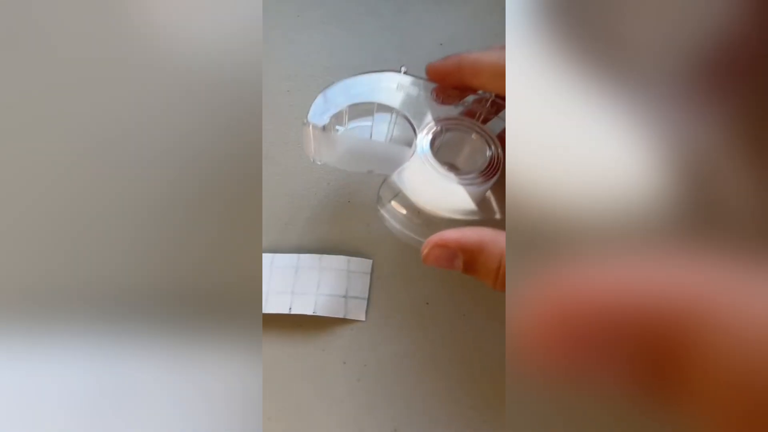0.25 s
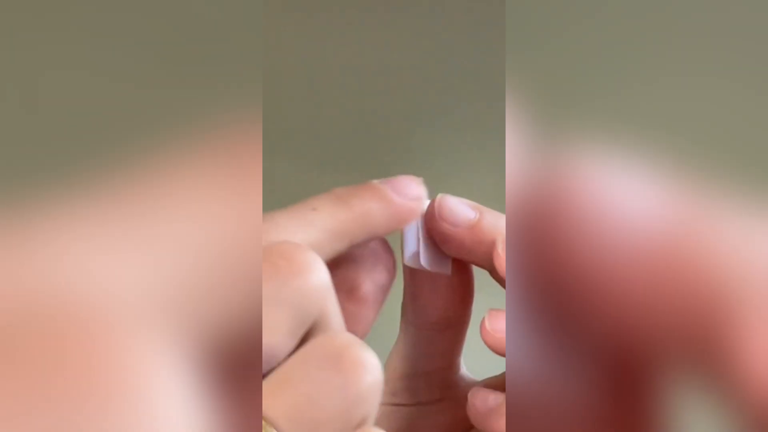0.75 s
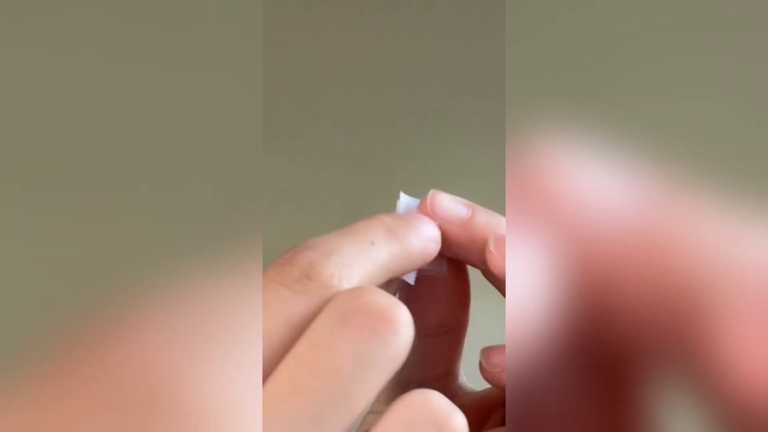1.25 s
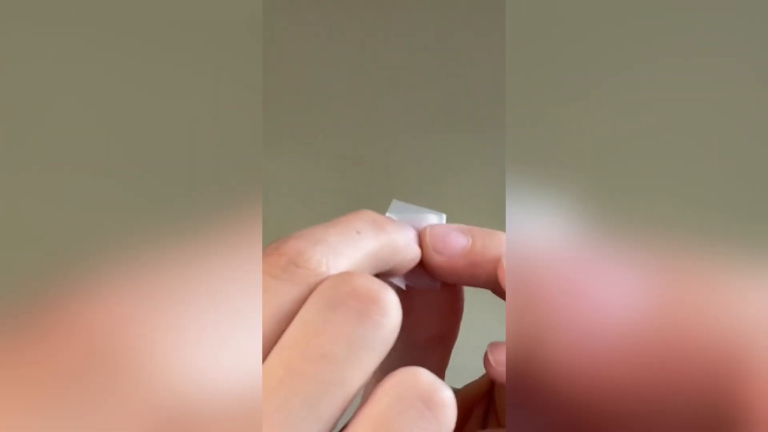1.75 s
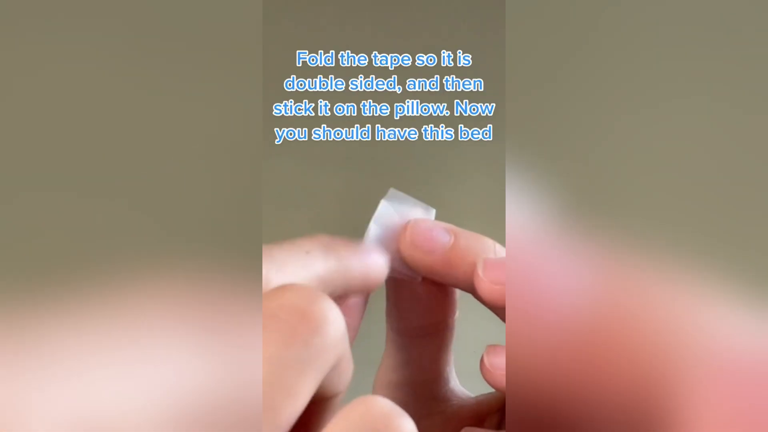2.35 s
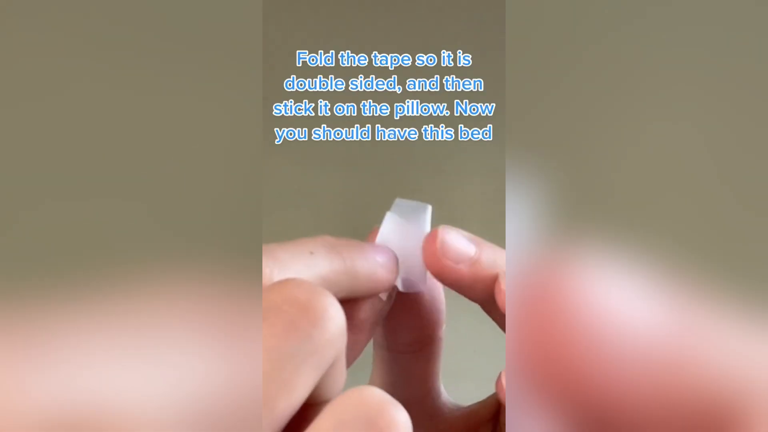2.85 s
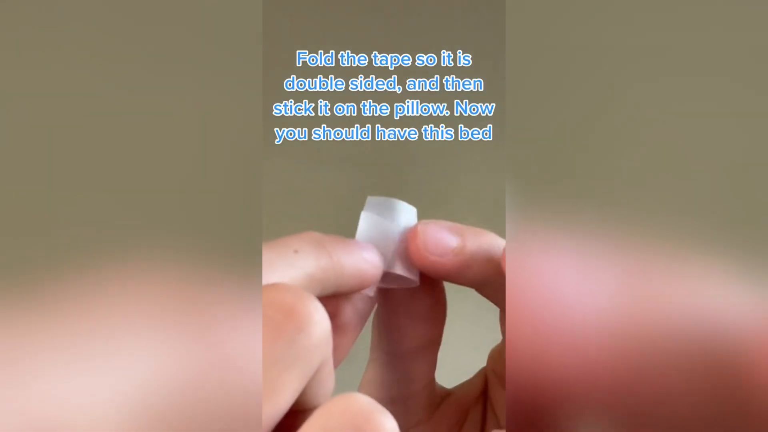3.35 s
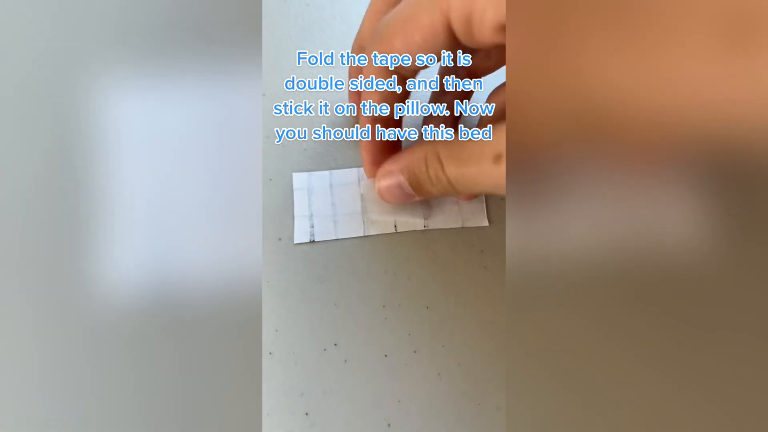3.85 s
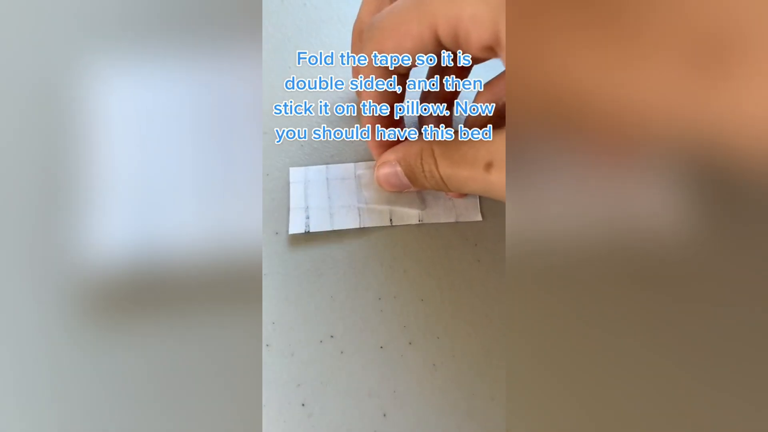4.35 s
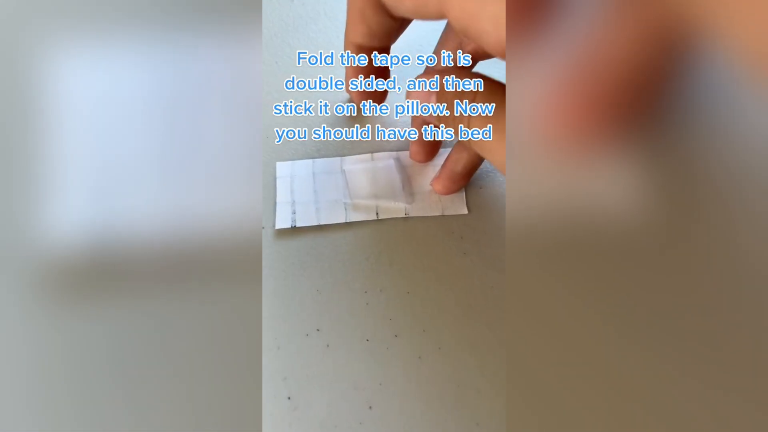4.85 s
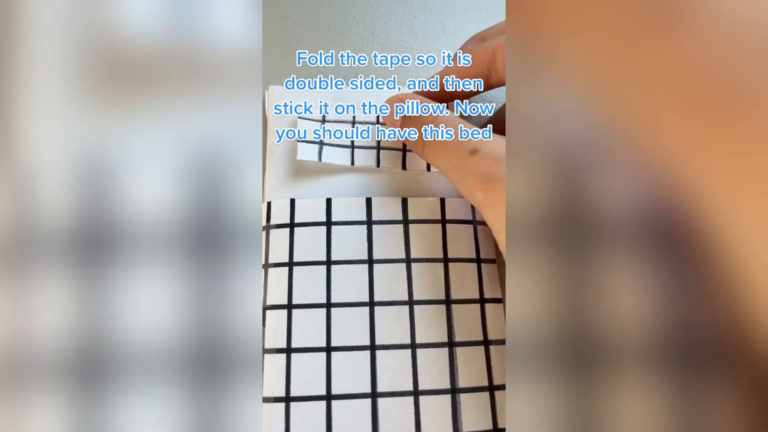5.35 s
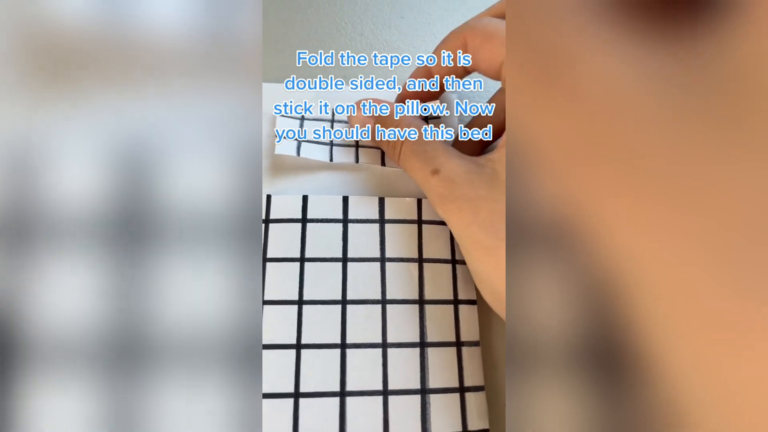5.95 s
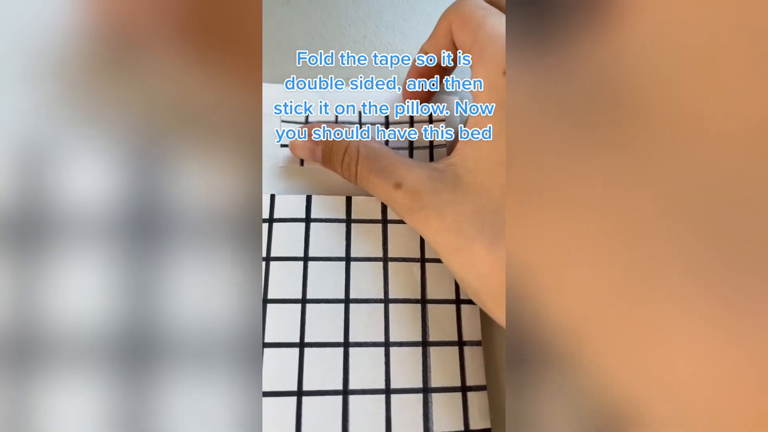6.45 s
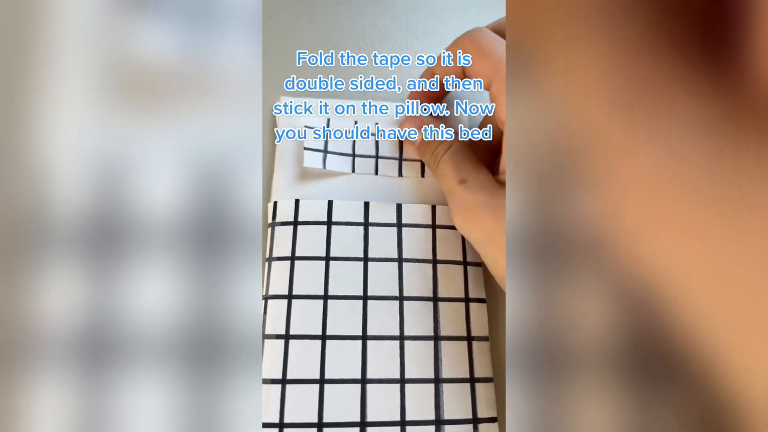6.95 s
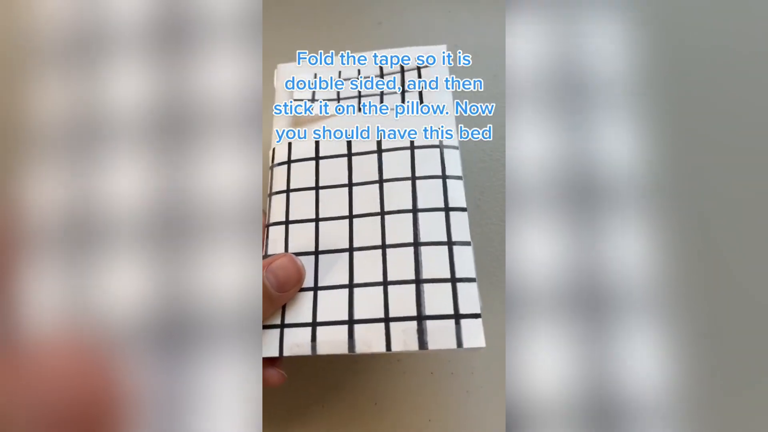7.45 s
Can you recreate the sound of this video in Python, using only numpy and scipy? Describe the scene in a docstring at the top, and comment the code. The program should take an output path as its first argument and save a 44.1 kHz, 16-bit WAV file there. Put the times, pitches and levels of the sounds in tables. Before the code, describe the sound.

Sticky tape crackles and snaps between fingers, then is pressed and rubbed onto paper on a desk, over a low ventilation rumble with brief near-silent gaps.

```python
"""Sticky tape on a small desk

Fingers fold a strip of tape, press it onto paper and smooth it down on a desk, close to a microphone.
Glue snaps are a pop plus tearing noise through resonances; film and paper are shaped, grainy noise.
A thumb judders over the sheet in short scuffs; ventilation is rumble, duct tone, room air and treble hiss.
A room tail answers the hands, and the sound drops almost to silence four times."""
import sys
import numpy as np
from scipy import signal
from scipy.fft import rfft, irfft, next_fast_len
from scipy.io import wavfile
from scipy.ndimage import uniform_filter1d

SR = 44100
rng = np.random.default_rng(int(sys.argv[2]) if len(sys.argv) > 2 else 0)


def dump(signal):
    """Clip the signal to [-1, 1] and save it as 16-bit WAV at the path in sys.argv[1]."""
    limited = np.clip(np.atleast_2d(signal).T, -1, 1)
    pcm = np.round(limited * 32767).astype(np.int16)
    wavfile.write(sys.argv[1], SR, pcm)


N = 339950

# near-silent gaps between the passages: start t/s, end t/s
GAPS = [(.292, .330), (3.360, 3.543), (4.893, 5.061), (6.995, 7.160)]
# ventilation rumble resonances: f/Hz, width/Hz, relative level/dB
RUMBLE_MODES = [(53.63, 10.6, 1.5), (61.85, 26.12, -6), (115.7, 16.35, -14.5)]
# room air noise before the work moves to the desk: f/Hz, relative density level/dB per Hz
ROOM_AIR = [(88, -37.5), (150, -9.5), (197, -21.5), (297, -4), (328, -27), (391, 1.5), (448, -12.5),
            (612, -23.5), (702, -30), (774, -23.5), (923, -55.5), (1040, -47.5), (2600, -37),
            (13200, -61.5), (16000, -66)]
# room air noise heard low over the desk: f/Hz, relative density level/dB per Hz
DESK_AIR_COLOUR = [(88, -34.5), (150, -21.5), (286, 1), (354, -14.5), (431, 5), (534, -13), (790, -13),
                   (941, -53), (1020, -18), (1390, -29), (5910, -39.5), (16000, -57.5)]
# duct resonances, before the response is squared: f/Hz, width/Hz, relative level/dB
DUCT_MODES = [(392.2, 17, -2), (766, 12, -10.5)]
# faint steady treble hiss: f/Hz, relative density level/dB per Hz
TREBLE_HISS = [(800, -21), (2200, -4), (7000, -3), (16000, -14)]
# ventilation per passage: rumble start level/dB, rumble end level/dB, air level/dB,
# duct tone level/dB, treble hiss level/dB
VENTILATION_LEVELS = [(-50.5, -49.5, -62.5, -75.5, -92), (-47.5, -45, -64.5, -62.5, -86.5),
                      (-52, -44.5, -64.5, -73.5, -96), (-51.5, -41, -67.5, -73, -83),
                      (-56.5, -49.5, -68.5, -76, -95)]
# rustling film noise: f/Hz, relative density level/dB per Hz
FILM_COLOUR = [(2500, -41), (3800, -2), (6000, -2), (10500, 2.5), (12500, -7.5), (15000, 1), (16500, -13.5)]
# resonances of the scraped sheet: f/Hz, width/Hz, relative level/dB
PAPER_MODES = [(1919, 330, 1.5), (2275, 220, 3.5), (3180, 1600, -4.5), (4050, 240, -12.5)]
# dull noise from the desk: f/Hz, relative density level/dB per Hz
DESK_COLOUR = [(88, -39.5), (150, -11), (216, -7.5), (274, -3.5), (483, -3.5), (544, -10), (1210, -20),
               (1600, -20), (2080, -42.5), (3520, -120)]
# thumb bearing down on the desk: middle t/s, level/dB
PRESSES = [(4.131, -54), (4.387, -57.5), (4.547, -52.5), (5.66, -54), (5.84, -59), (6.485, -50.5),
           (6.82, -50)]
# skin over film and paper: start t/s, length/s, rustle level/dB, paper pressure level/dB, film f/Hz
RUBS = [(0.451, 0.04, -79, -87, 4730), (0.555, 0.13, -75.5, -82, 8900), (0.704, 0.67, -83, -88.5, 9500),
        (0.78, 0.068, -75, -86.5, 6460), (0.86, 0.033, -67.5, -84, 9700), (0.933, 0.048, -62, -78, 9500),
        (1.002, 0.024, -57.5, -85, 9300), (1.05, 0.056, -77, -88, 6890), (1.116, 0.022, -65.5, -84, 9600),
        (1.159, 0.022, -74, -93, 9646), (1.246, 0.04, -66.5, -84, 7560), (1.441, 0.027, -72, -94, 9646),
        (1.526, 0.075, -75, -90, 9800), (1.645, 0.17, -79, -81.5, 5660), (2.018, 0.06, -69, -88, 10700),
        (2.106, 0.064, -73.5, -84, 6460), (2.184, 0.079, -70.5, -76, 6700), (2.512, 0.35, -73, -91.5, 7000),
        (3.108, 0.11, -84.5, -80, 5130), (3.224, 0.073, -78, -80, 6000), (3.295, 0.054, -70.5, -83, 8450),
        (3.703, 0.15, -80, -80, 10900), (3.859, 0.018, -92, -67, 5857), (3.938, 0.029, -81, -70, 10335),
        (4.111, 0.033, -71.5, -63.5, 10680), (4.229, 0.056, -78.5, -85, 7579),
        (4.334, 0.029, -64, -76, 7500), (4.515, 0.05, -80, -70, 7579), (4.844, 0.11, -79.5, -72.5, 5960),
        (5.213, 0.11, -80, -76.5, 4900), (5.411, 1.6, -85.5, -81.5, 6950), (5.43, 0.11, -79.5, -81.5, 6900),
        (5.563, 0.17, -70, -68.5, 6760), (5.815, 0.044, -69.5, -63, 5660), (5.912, 0.062, -74, -72, 5050),
        (6.019, 0.086, -71, -73, 6960), (6.141, 0.12, -68, -66, 5270), (6.257, 0.15, -86, -74, 5400),
        (6.442, 0.098, -90, -68, 5512), (6.486, 0.091, -67, -80, 6040), (6.576, 0.14, -64, -70.5, 6100),
        (6.716, 0.068, -73.5, -63.5, 5800), (6.785, 0.067, -81, -57, 5857),
        (6.833, 0.071, -65, -68.5, 5870), (6.944, 0.16, -70.5, -70.5, 5180),
        (7.173, 0.15, -85.5, -88, 4840)]
# paper lying on the desk, rung by the slips: f/Hz, width/Hz, relative level/dB
SHEET_MODES = [(584, 230, 15), (2270, 610, 4.5), (3140, 230, 3), (5800, 1700, -7)]
# glue letting go: t/s, peak reference level/dB, tearing noise over the pop level/dB (halved later),
# body level/dB, torn edge level/dB, film f/Hz; body and edge levels are relative to the reference
GLUE_SNAPS = [(0.464, -49, -2, -4.5, -31, 4230), (0.6062, -30.5, 19, -6, -9, 7640),
              (0.765, -54, -9, -18, -4, 4400), (0.798, -53.5, -5, -7, 1, 6860),
              (0.8623, -54, 7, -8, -11, 9800), (0.95, -51, 3, -15, 3, 10600),
              (0.987, -41, 4, -26, -3, 9000), (1.011, -37.5, -7, -40, -10.5, 10200),
              (1.113, -49, -10, -10, -22, 9700), (1.1975, -32, -7.5, -13, -25, 8500),
              (1.2254, -36.5, -10, -15, -18, 10500), (1.226, -31, 0, -10.5, -24, 9200),
              (1.288, -34.5, -4, -18, -30, 10100), (1.568, -39.5, 24, -27, -28, 9600),
              (1.6765, -47.5, 1, -0.5, -33, 5760), (1.7786, -48.5, -6, 0, -17, 5370),
              (2.036, -30, -5.5, -17.5, -3, 10000), (2.122, -44.5, 1.5, -0.5, -4, 6060),
              (2.246, -38.5, -4, -4, -1, 6230), (2.5289, -33.5, -9.5, -15, -2.5, 7600),
              (2.56, -45.5, -0.5, -27.5, -22, 7360), (2.7358, -21.5, -12, -5.5, -0.5, 7200),
              (2.7389, -18.5, 1, -28.5, -7, 6100), (2.745, -42, 8.5, -22, -10, 7600),
              (2.7483, -20, -7, -18, -9.5, 7300), (3.093, -54, 7, 0, -27.5, 4680),
              (3.109, -55, -8, -9, -30, 5300), (3.137, -52, -12.5, 2, -17, 4000),
              (3.1458, -46.5, -10, -7, -27, 5500), (3.181, -53, -10, -10, -16, 5200),
              (3.2268, -44, -12, -4, -31, 4770), (3.2564, -51, -19.5, 3, -30, 5360),
              (3.6091, -25.5, -12, -23, -31, 9800), (3.717, -48, -16, -4, -33, 5300),
              (3.7236, -33.5, -4, -3.5, -11, 9800), (3.751, -26, -10.5, -4.5, -12, 9700),
              (4.264, -40.5, -2.5, -4.5, -25.5, 5770), (4.2848, -55.5, -9, 2, -10, 7360),
              (4.311, -28, -9, -7, -21, 5800), (4.3784, -24.5, -5, -5, -10.5, 7800),
              (4.3806, -36.5, 4, -5, -2, 8200), (4.3842, -43, 2.5, -12, 7, 8400),
              (4.3884, -45.5, 7.5, -6, 3, 10200), (4.391, -30.5, 0, -1.5, -5, 8440),
              (4.3918, -42.5, -2, 1, -9, 10500), (4.5426, -28.5, 4.5, -8, -13, 5900),
              (4.5456, -26, 2, -11.5, -11, 7800), (4.548, -63.5, -18.5, -7, -13, 7900),
              (4.8684, -51, -4, -10, -28.5, 4980), (5.45, -51, 1, -9.5, -23, 5800),
              (5.567, -56, -8, 1, -20, 5040), (5.578, -42.5, -3, 0.5, -18, 8800),
              (5.6092, -45.5, -2, 4.5, -30, 7470), (5.6295, -43, 6, -3.5, -30, 8000),
              (5.645, -47, -3, -7, -11, 7290), (5.6692, -42, -5, 2, -18, 7900),
              (5.778, -59, 5, 0, -10, 5600)]
# decay of the room: f/Hz, t60/s
ROOM_DECAY = [(500, 0.69), (2500, 0.32), (8000, 0.21), (16000, 0.1)]

ON_DESK_S = 3.45  # from here on the work lies on the desk
THUMP_S = 0.056  # width of a press between its 1/e points
DRONE_DB = 6  # desk drone over the paper scrape at any pressure
# one catch, then a run of slips: middle, spacing, top level, loss at its ends
CATCH_S, CATCH_DB = 6.7615, -34.5
JUDDER_S, SLIP_GAP_S, JUDDER_DB, SWELL_DB = 6.8198, .0108, -28.5, 6.5
SNAP_T60_S, T60_SCATTER = 0.019, 0.15  # tear decay time and its log-normal scatter
# pop delay; level of the hiss around the pop before halving, its e-fold time
LEAD_S, LEAD_DB, LEAD_RISE_S = 0.001, -16, 0.0022
# faint snaps: level over the rustle, its spread, body, torn edge, tear before halving
TICK_DB, TICK_SCATTER_DB, TICK_BODY_DB, TICK_EDGE_DB = 15, 1, -15, -13.5
TICK_TEAR_DB = -4
TOP_HZ, SLOPE_HZ = 16900, 1200  # band limit and the width of its slope


def amp(db):
    """Gain of a level in dB."""
    return 10 ** (np.asarray(db) / 20)


def unit(x):
    """x at rms 1."""
    return x / np.sqrt(np.mean(x ** 2) + 1e-20)


def peak(x):
    """x at peak 1."""
    return x / np.abs(x).max()


def along(points, hz):
    """Read a (f/Hz, value) curve on a log frequency axis."""
    f, v = np.transpose(points)
    return np.interp(np.log(hz + 1), np.log(f + 1), v)


def colour(spectrum):
    """Frequency gain drawn through (f/Hz, level/dB) points."""
    return lambda hz: amp(along(spectrum, hz))


def filtered(x, response):
    """x shaped by a complex response of frequency."""
    m = next_fast_len(len(x) + 8192)
    return irfft(rfft(x, m) * response(np.fft.rfftfreq(m, 1 / SR)), m)[:len(x)]


def modes(table):
    """Response of (f/Hz, width/Hz, level/dB) resonances side by side, with alternating signs."""
    def response(f):
        total = 0
        for k, (center, width, db) in enumerate(table):
            damping = 1j * f * width
            total = total + (-1) ** k * amp(db) * damping / (center * center - f * f + damping)
        return total
    return response


def hiss(response, grain_db=0, grain_s=0.003):
    """Filtered noise of rms 1; grain_db roughens it into many tiny bursts."""
    flutter = unit(uniform_filter1d(rng.standard_normal(N), max(1, int(grain_s * SR))))
    grain = amp(grain_db * flutter)
    return unit(filtered(grain * rng.standard_normal(N), response))


def ventilation():
    """A fan's unsteady rumble, a fuzzy duct tone, the air of the room and a faint treble hiss."""
    rumble = hiss(modes(RUMBLE_MODES))
    # the rumble wavers less than free noise: part of its own swell is evened out
    swell = np.sqrt(np.abs(uniform_filter1d(rumble ** 2, int(.06 * SR)))) + 0.09
    # a steep low cut clears the bottom below 43 Hz
    rumble = unit(filtered(rumble / swell ** 0.49, lambda f: 1 / (1 + (43 / (f + 1)) ** 9)))
    tone = hiss(lambda f: modes(DUCT_MODES)(f) ** 2)
    t = np.arange(N) / SR
    passage = np.searchsorted(np.transpose(GAPS)[1], t)
    air = np.where(t > ON_DESK_S, hiss(colour(DESK_AIR_COLOUR)), hiss(colour(ROOM_AIR)))
    treble = hiss(colour(TREBLE_HISS))
    start_db, end_db, air_db, tone_db, treble_db = np.transpose(VENTILATION_LEVELS)
    # the rumble glides evenly in dB through each passage
    rumble_db = np.interp(t, [0, *np.ravel(GAPS), N / SR], np.ravel([start_db, end_db], "F"))
    low = amp(rumble_db) * rumble + amp(tone_db)[passage] * tone
    return low + amp(air_db)[passage] * air + amp(treble_db)[passage] * treble


def whistle():
    """Noise through two narrow resonances, nearly an octave apart, whistles as the pad is lifted."""
    t = np.arange(N) / SR
    narrow = hiss(lambda f: modes([(2050, 170, 2.5), (3850, 350, -5)])(f) ** 2)
    return amp(-79.5) * narrow * (t > GAPS[-1][1]) * np.clip((7.36 - t) / 0.03, 0, 1)


def room(x):
    """Delayed decaying noise forms the room's answer; each frequency dies at its own speed."""
    hz, t, z = signal.stft(rng.standard_normal(SR // 2), SR, nperseg=256)
    decay = amp(-60 * t / along(ROOM_DECAY, hz)[:, None])
    tail = signal.istft(z * decay, SR, nperseg=256)[1]
    return signal.fftconvolve(np.pad(x, (120, 0)), tail / np.linalg.norm(tail))[:N]


def desk_echo(x):
    """The desk top returns the sound a fraction of a millisecond late: a comb of peaks and notches."""
    late = filtered(x, lambda f: 0.28 * np.exp(-2j * np.pi * f * 0.000369))  # delay in s
    return x + late * (np.arange(N) / SR > ON_DESK_S)


def thumps():
    """Each press swells and fades as a dull burst through the desk."""
    t = np.arange(N) / SR
    swell = sum(amp(db) * np.exp(-((t - s) / (THUMP_S / 2)) ** 2) for s, db in PRESSES)
    return swell * hiss(colour(DESK_COLOUR), grain_db=7.0, grain_s=0.005)


def handling():
    """Each stroke rustles the film at its own pitch, scrapes the paper and presses a dull desk drone."""
    out = np.zeros(N)
    film = hiss(colour(FILM_COLOUR), grain_db=1.0, grain_s=0.0012)
    paper = hiss(modes(PAPER_MODES), grain_db=3.5, grain_s=0.0039)
    desk = hiss(colour(DESK_COLOUR), grain_db=0.5, grain_s=0.0076)
    edge = 0.019  # s; skin takes this long to grip and to let go
    for s, length, film_db, press_db, film_hz in RUBS:
        # a stroke never runs past the end of the next gap
        limits = [end for _, end in GAPS if end > s + edge]
        stop = min(s + length + edge / 2, *limits, N / SR)
        span = slice(max(round((s - edge / 2) * SR), 0), round(stop * SR))

        def film_tone(f):
            low_cut = f ** 4 / (f ** 4 + (0.24 * film_hz) ** 4)
            return low_cut + modes([(film_hz, 1200, 8)])(f)

        rustle = unit(filtered(film[span], film_tone))
        push = signal.windows.tukey(len(rustle), min(2 * edge * SR / len(rustle), 1))
        scrape = paper[span] + amp(DRONE_DB) * desk[span]
        out[span] += push * (amp(film_db) * rustle + amp(press_db) * scrape)
    return out


def slips():
    """The thumb catches once, then judders: each slip is a short scuff ringing the sheet."""
    out, t = np.zeros(N), np.arange(SR // 30) / SR
    place = np.arange(6) - 5 / 2  # six slips about the middle
    run_db = JUDDER_DB - SWELL_DB * (place / place[-1]) ** 2
    run = zip(JUDDER_S + SLIP_GAP_S * place, run_db)
    for s, db in [(CATCH_S, CATCH_DB), *run]:
        envelope = amp(-60 * t / 0.0078) * (1 - np.exp(-t / 0.00059))
        scuff = envelope * rng.standard_normal(len(t))
        scuff[SR // 2000] += 3  # the sharp moment of release
        ring = filtered(scuff, modes(SHEET_MODES))
        out[round(s * SR):][:len(t)] += amp(db) * peak(ring)
    return out


def ticks():
    """Faint snaps: two at random moments of each stroke, their level following its rustle."""
    s, length, film_db, _, film_hz = np.repeat(RUBS, 2, axis=0).T
    when, size, pitch = rng.random((len(s), 3)).T
    moments = s + when * length
    levels = film_db + TICK_DB + TICK_SCATTER_DB * (2 * size - 1)
    pitches = film_hz * 2 ** (pitch - .7)
    return [(moment, db, TICK_TEAR_DB, TICK_BODY_DB, TICK_EDGE_DB, hz)
            for moment, db, hz in zip(moments, levels, pitches)]


def snaps():
    """Each snap swells in on a brief hiss, pops and tears, ringing film, body, edge, thud and crack."""
    pad = SR // 100  # room ahead of each snap for the hiss
    out, t = np.zeros(N + SR), (np.arange(SR // 16) - pad) / SR
    pop = np.zeros(len(t))
    pop[pad + round(LEAD_S * SR)] = 1
    for s, db, tear_db, body_db, edge_db, film_hz in GLUE_SNAPS + ticks():
        t60 = np.clip(SNAP_T60_S * np.exp(rng.normal(0, T60_SCATTER)), .003, .1)
        noise, sign = rng.standard_normal((5, len(t))), rng.choice([-1, 1], size=5)
        after = np.maximum(t, 0)
        tear = amp(tear_db - 60 * (after / t60) ** 1.38) * (1 - np.exp(-after / 0.0003))
        lead = amp(LEAD_DB) * np.exp(-np.abs(t - LEAD_S) / LEAD_RISE_S)  # crests at the pop
        if s > ON_DESK_S:
            body_hz, body_width, thud_db, body_tear_db = 2354.5, 1199.5, -12, -5
        else:
            body_hz, body_width, thud_db, body_tear_db = 2398.5, 2301, -10.5, -4.5
        # f/Hz, width/Hz before squaring, level/dB, noise level/dB
        voices = [(film_hz, 2600, -3, 0),
                  (body_hz, body_width, body_db, body_tear_db),
                  (13500, 6000, edge_db, 0),  # torn edge
                  (650, 900, body_db + thud_db, 0),  # thud
                  (5499.5, 6999, -9, 0.5)]  # broad crack
        for n, way, (hz, width, level_db, noise_db) in zip(noise, sign, voices):
            ringing = lambda f: modes([(hz, width, 0)])(f) ** 2
            struck = way * peak(filtered(pop, ringing))
            torn = unit(filtered(n, ringing)) * amp(noise_db) * (tear + lead) / 2
            out[round(s * SR):][:len(t)] += amp(db + level_db) * peak(struck + torn)
    return out[pad:][:N]


def scene():
    """Hands work near the microphone; the room answers them over the hum."""
    hits = desk_echo(snaps() + slips())
    rubs = desk_echo(handling() + thumps())
    hit_send_db = np.where(np.arange(N) / SR > ON_DESK_S, -17, -14.5)
    answer = room(amp(hit_send_db) * hits + amp(-8.5) * rubs)
    return (hits + rubs + answer + whistle() + ventilation())[None]


def record(dry):
    """The sound drops away in each gap; nothing passes above the band limit."""
    t, gain = np.arange(N) / SR, np.ones(N)
    for start, end in GAPS:
        fall = amp(np.maximum(-30 - 400 * (t - start), -60))  # from -30 dB down to -60 dB
        gain = np.where((t >= start) & (t < end), fall, gain)
    gain = uniform_filter1d(gain, size=3)  # the edges are abrupt
    return filtered(dry[0] * gain, lambda hz: np.clip((TOP_HZ - hz) / SLOPE_HZ, 0, 1) ** 3)[None]


dry = scene()
out = record(dry)
dump(out)
```